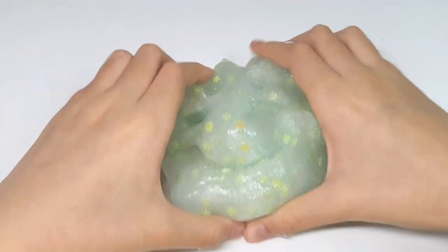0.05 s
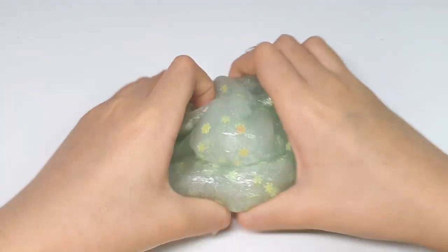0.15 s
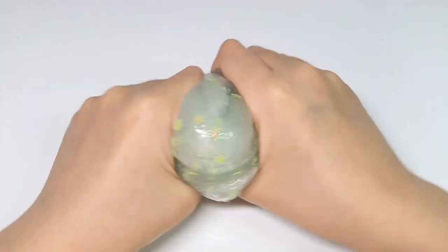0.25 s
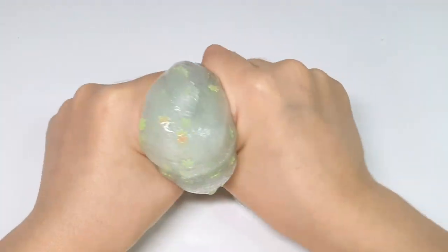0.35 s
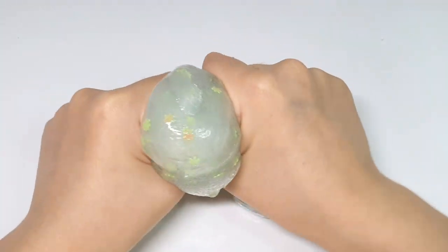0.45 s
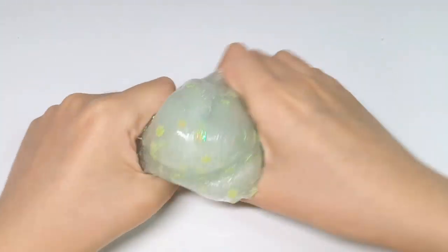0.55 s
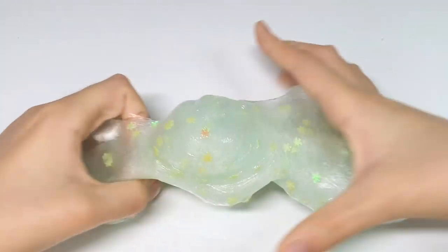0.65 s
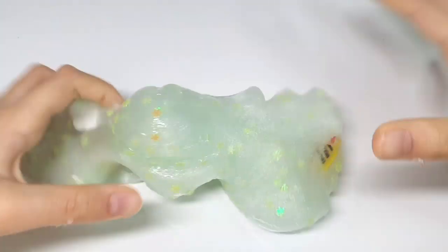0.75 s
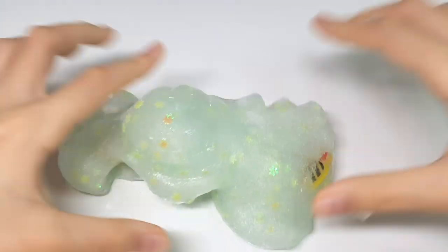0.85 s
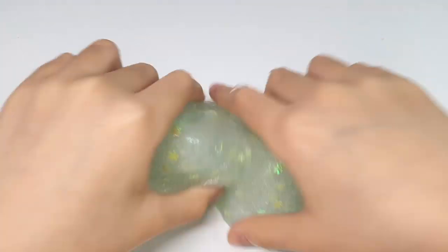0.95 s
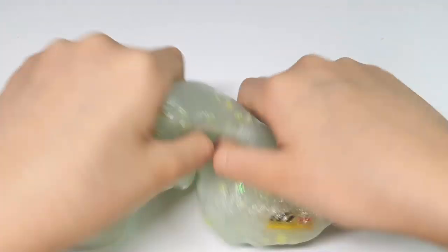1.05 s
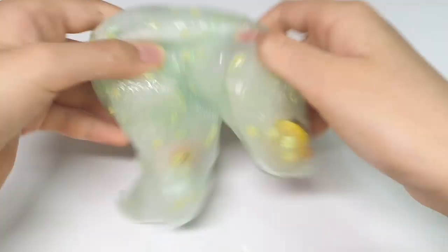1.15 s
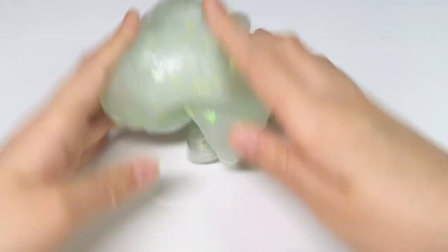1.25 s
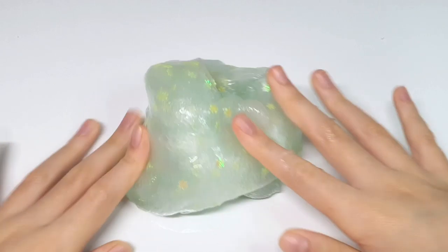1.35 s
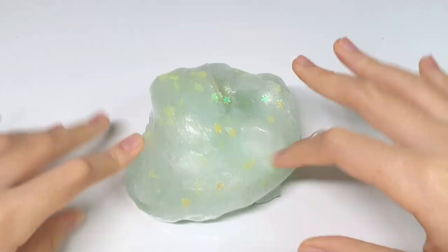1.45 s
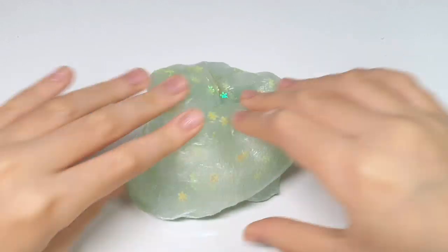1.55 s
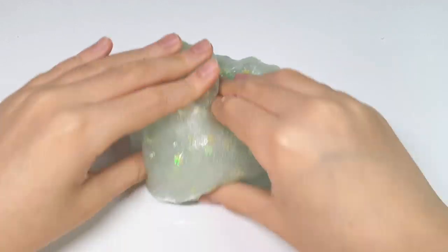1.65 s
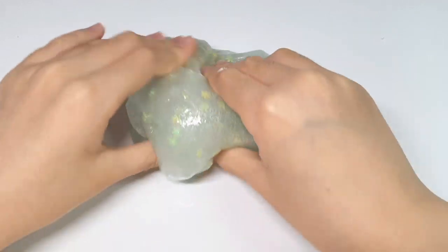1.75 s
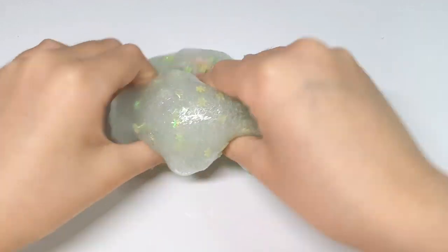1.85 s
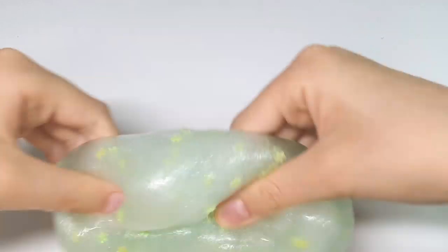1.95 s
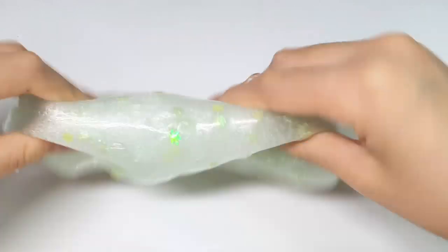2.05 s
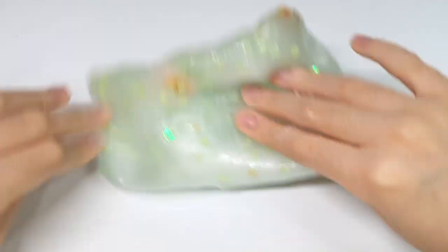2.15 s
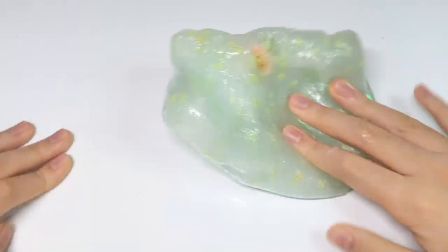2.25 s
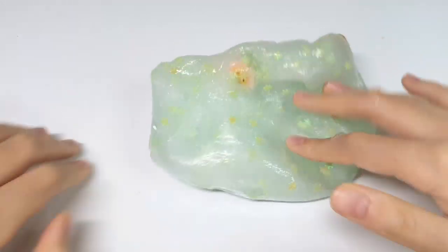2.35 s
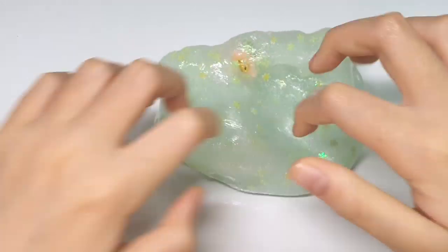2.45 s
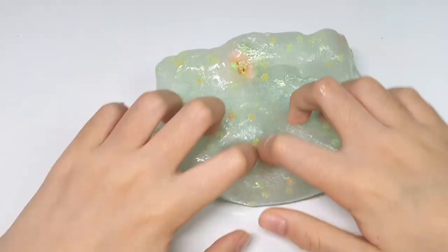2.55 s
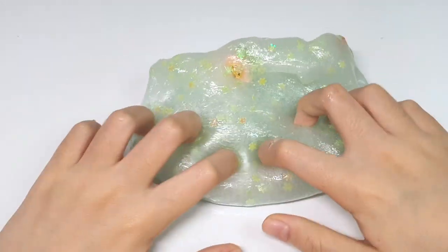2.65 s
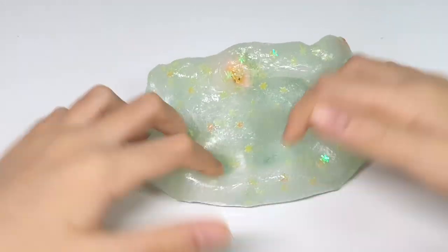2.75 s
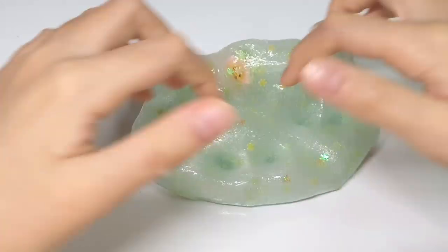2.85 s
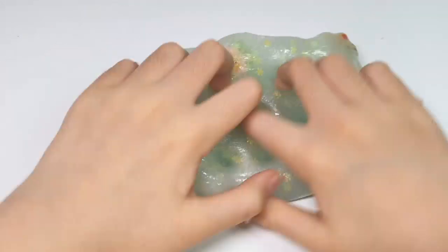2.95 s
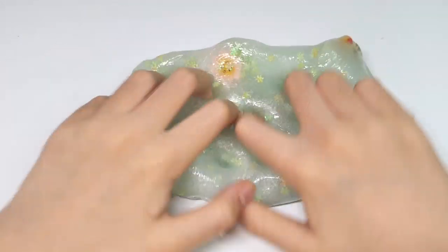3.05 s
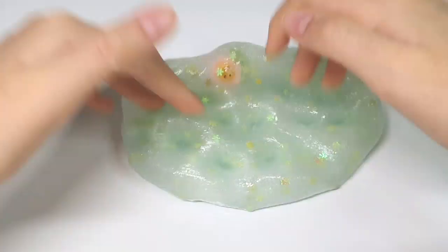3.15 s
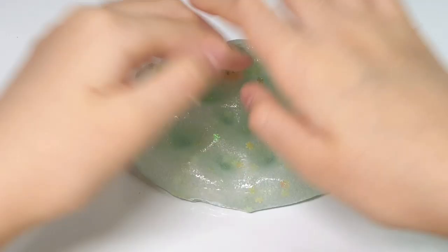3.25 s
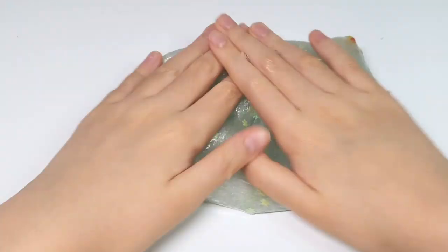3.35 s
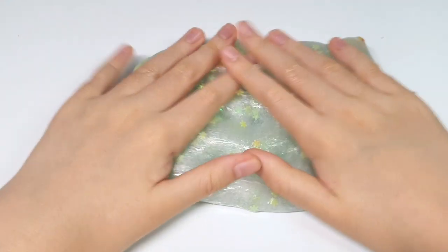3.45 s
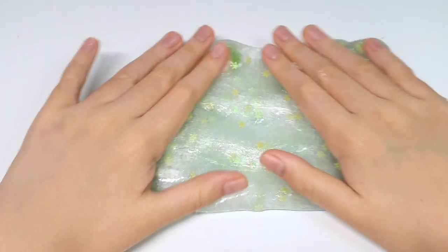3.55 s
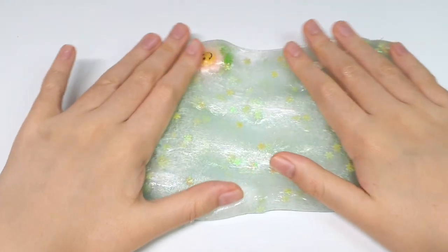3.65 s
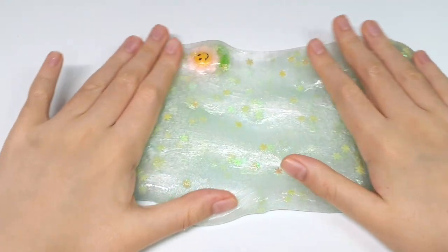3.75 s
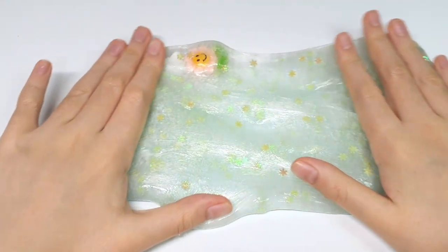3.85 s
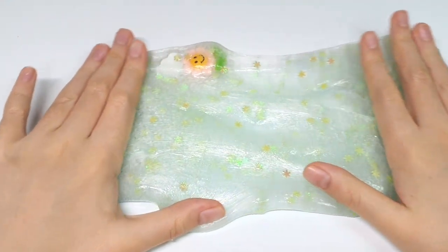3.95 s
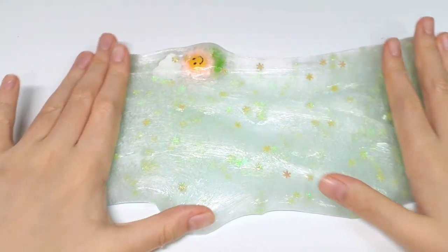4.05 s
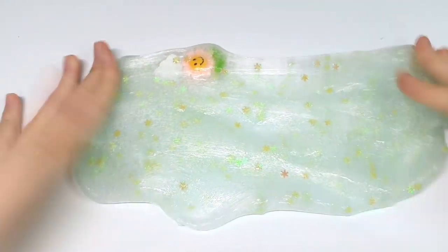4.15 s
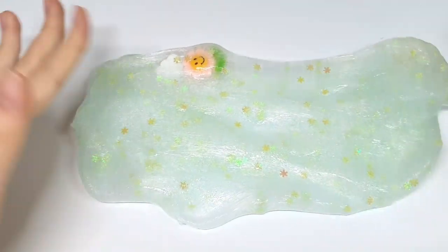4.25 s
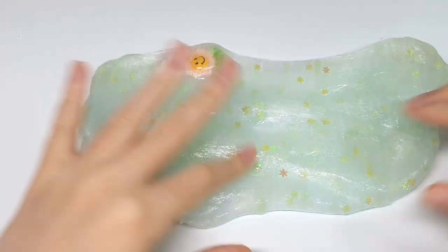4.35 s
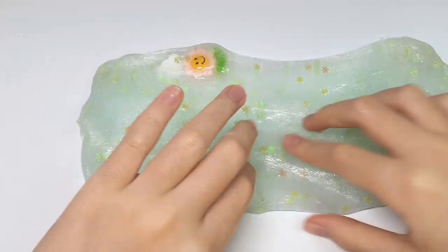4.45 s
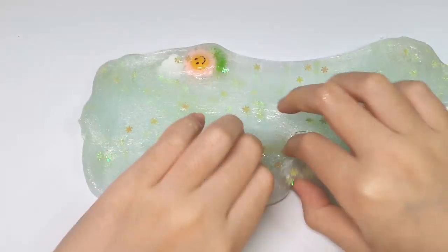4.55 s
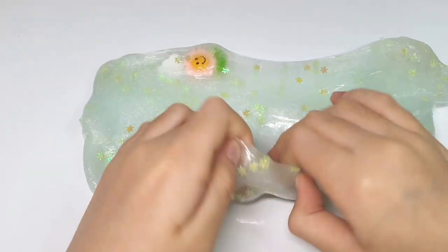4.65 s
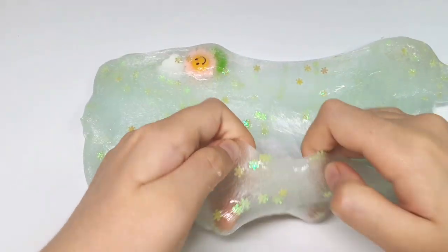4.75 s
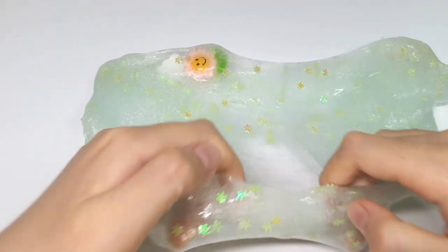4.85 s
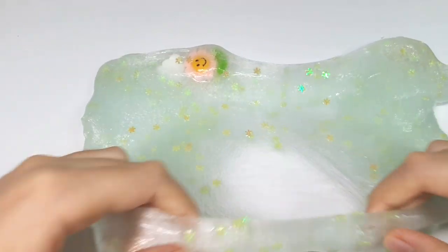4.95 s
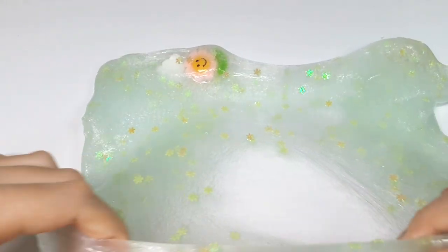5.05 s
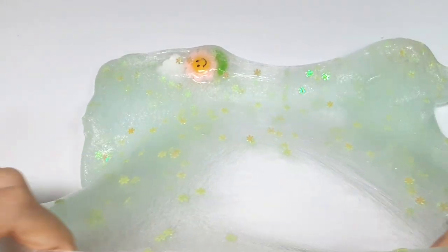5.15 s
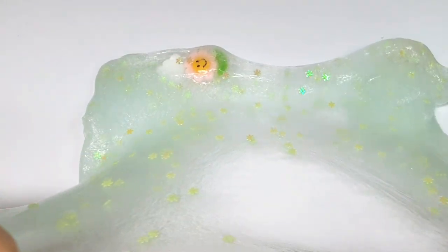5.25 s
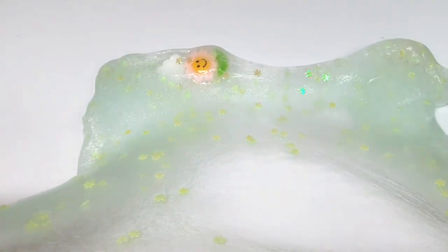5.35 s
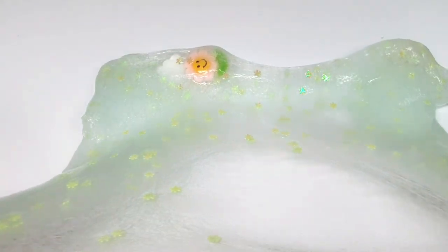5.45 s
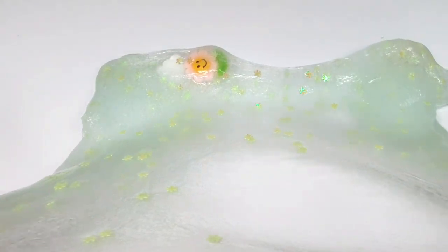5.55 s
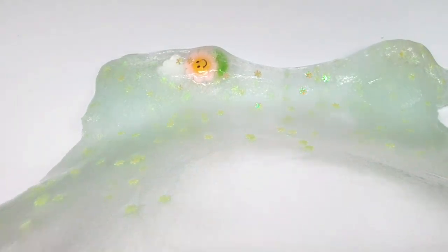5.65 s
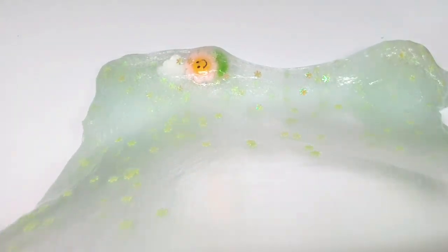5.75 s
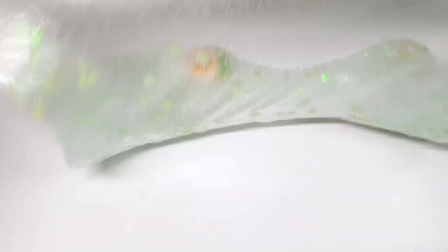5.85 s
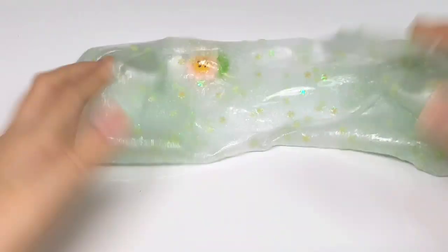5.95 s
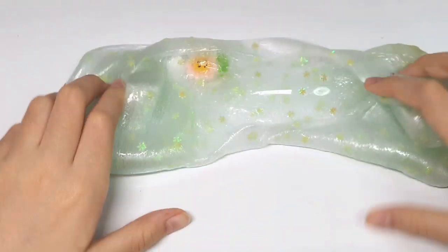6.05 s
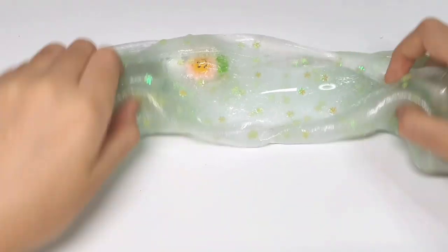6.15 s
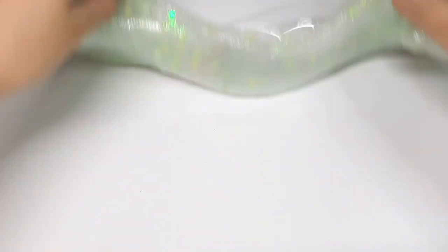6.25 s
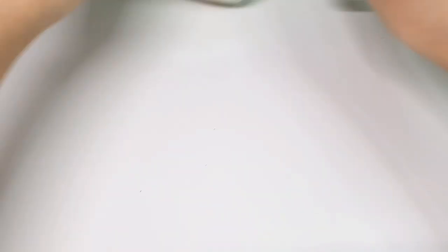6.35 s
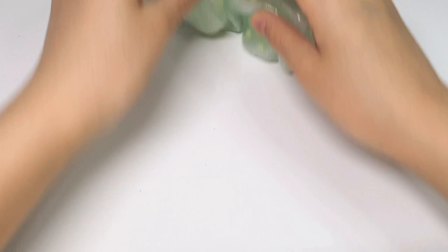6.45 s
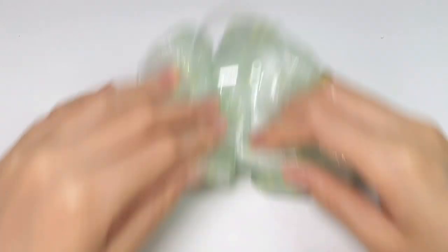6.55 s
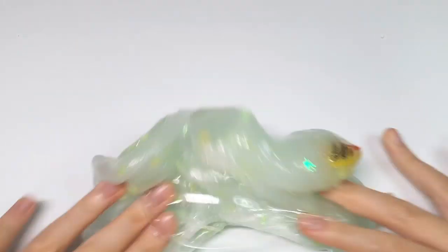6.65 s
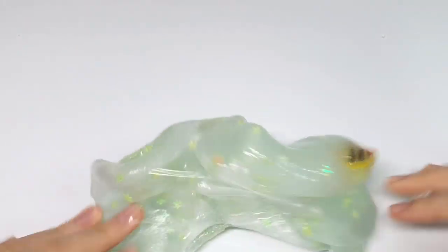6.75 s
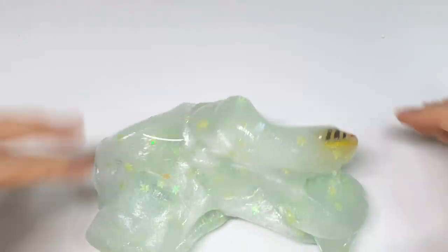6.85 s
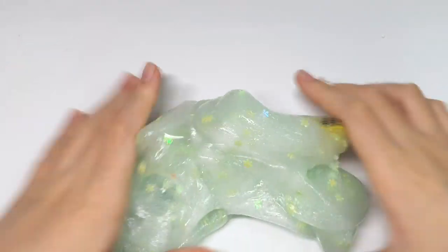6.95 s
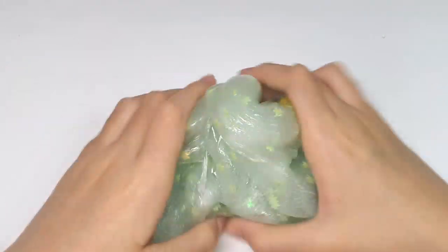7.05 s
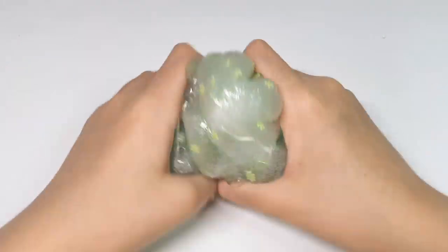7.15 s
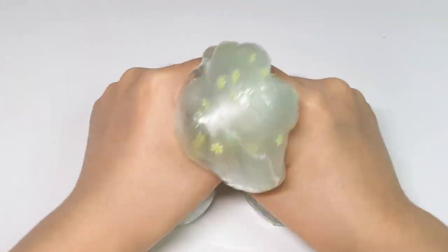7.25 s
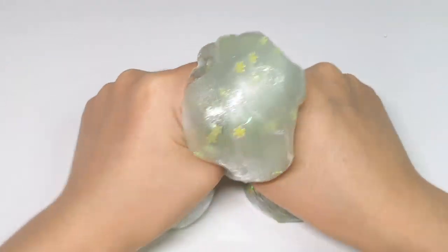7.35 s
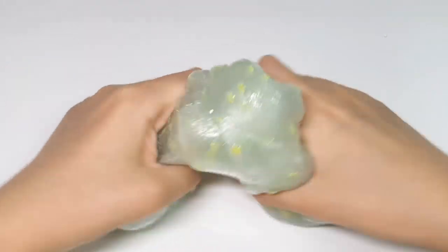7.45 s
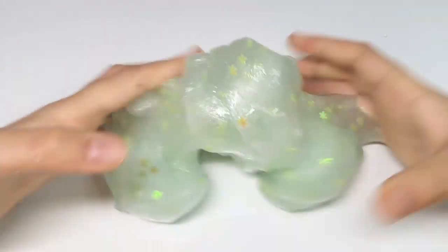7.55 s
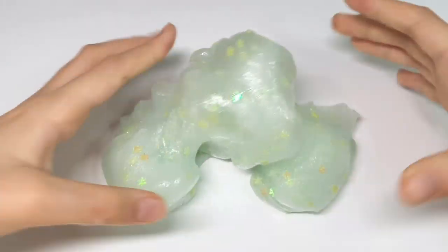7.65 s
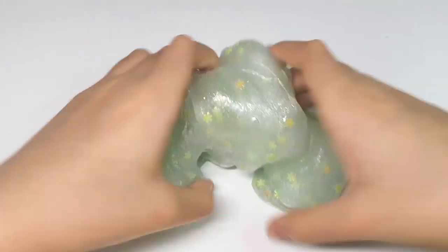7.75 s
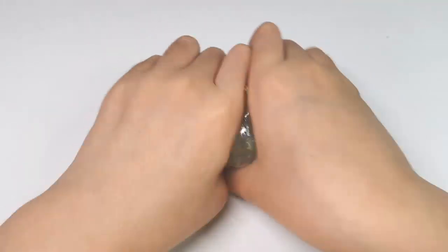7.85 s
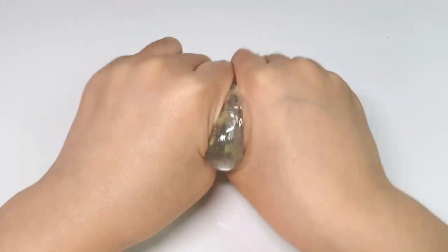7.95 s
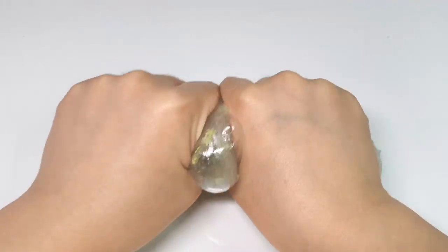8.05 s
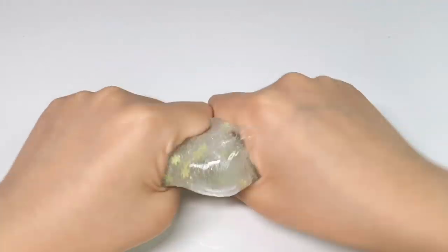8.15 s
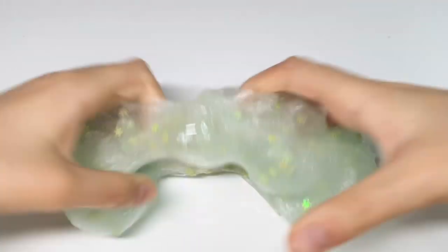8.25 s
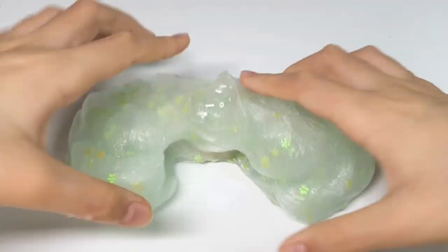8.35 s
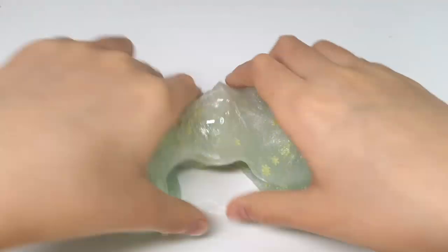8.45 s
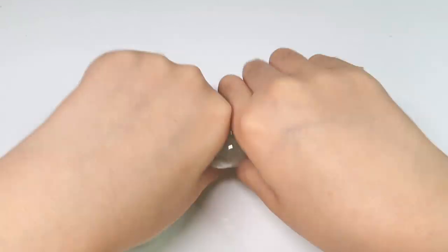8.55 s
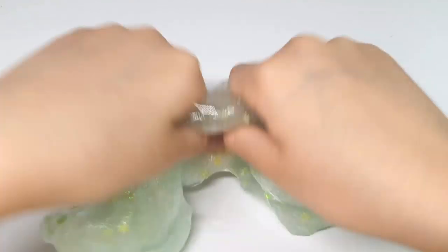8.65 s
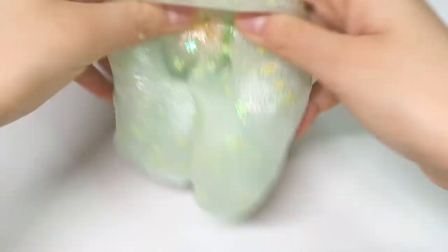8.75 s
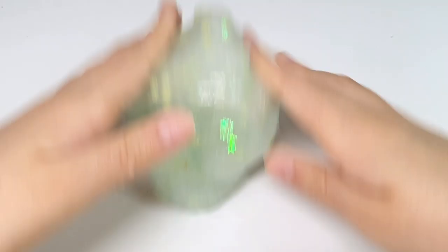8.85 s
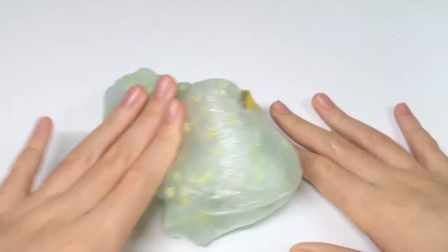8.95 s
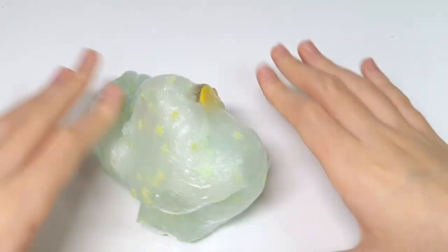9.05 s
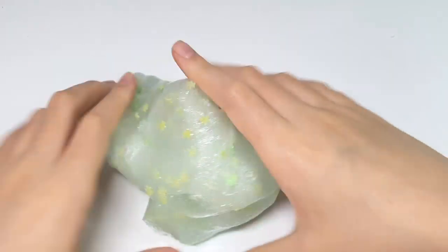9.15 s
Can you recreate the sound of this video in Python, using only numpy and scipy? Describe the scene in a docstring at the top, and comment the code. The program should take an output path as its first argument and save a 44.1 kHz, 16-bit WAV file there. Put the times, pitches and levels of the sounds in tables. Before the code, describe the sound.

Hands knead, fold and stretch sticky slime on a table, with wet crackles, sharp pops, dry snaps and dull thuds, close up in stereo.

```python
"""Two hands knead, fold and stretch sticky slime on a table, heard close up in stereo in a small, quiet room.
Under it all lie a soft room hiss and a faint ticking of sticky film, built from random clicks.
From the start, landings thud as damped bounces, air pockets pop as short rings, and grips crackle and fizz.
Threads snap with dry clicks and taut film squeaks. Near 5 s the drawn-out sheet is almost silent, with a faint
hum. From about 6 s grips and landings return, and the pops soon crowd together until the end."""
import sys
import numpy as np
from scipy import signal
from scipy.fft import rfft, irfft, next_fast_len
from scipy.io import wavfile
from scipy.ndimage import uniform_filter1d

SR = 44100
rng = np.random.default_rng(int(sys.argv[2]) if len(sys.argv) > 2 else 0)


def master_out(mix):
    """Clip the mix to full scale and print it as 16-bit PCM to the path in sys.argv[1]."""
    frames = np.transpose(np.atleast_2d(mix))
    ceiling = np.clip(frames, -1, 1)
    pcm = np.round(ceiling * 32767).astype(np.int16)
    wavfile.write(sys.argv[1], SR, pcm)


N = 406161

# hands and slime land on the table; a tight lump bounces faster than a slack one:
# (time [s], relative thud level [dB], relative palm slap level [dB], bounce pitch [Hz])
LANDINGS = [(0.0366, -25.5, -67, 124.3), (0.6511, -39.5, -59, 120), (0.77, -43, -53.5, 125),
            (0.874, -43, -62, 115), (1.0203, -29, -32, 130.4), (1.4157, -31.5, -39, 118),
            (1.648, -38, -45.5, 139), (1.8243, -39.5, -52, 129), (1.963, -41, -51.5, 101),
            (2.2099, -27.5, -28, 114.5), (2.235, -42, -45, 44.8), (2.827, -42.5, -51, 136),
            (3.3836, -41, -52, 129), (4.038, -60.5, -58.5, 145), (4.427, -36.5, -45, 110),
            (4.4953, -37, -54, 123), (6.053, -33, -42.5, 45.4), (7.021, -27.5, -44.5, 124.7),
            (7.109, -36.5, -49, 134), (8.957, -25.5, -34, 116.6)]
# low resonances of the table top, which thud: (pitch [Hz], width [Hz], level [dB])
THUD_MODES = [(36, 36, -3), (118.1, 13, 4), (141.5, 7, 5.5), (175.3, 1.9, 2)]
# upper resonances of the table top, which slap: (pitch [Hz], width [Hz], level [dB])
SLAP_MODES = [(270, 37, -2.5), (330, 43, -1), (392.2, 18, 2), (457, 13, 0.5), (611, 29, -8.5),
              (726, 19, -9)]
# shared colour of crackle and clicks, strongest near 1.9 kHz: (frequency [Hz], level [dB])
CRACKLE_COLOUR = [(700, -18), (1150, 2), (1550, 1.5), (1850, 7.5), (2400, -3), (2750, -1), (4500, -10.5),
                  (6500, -33.5)]
LET_GO_DB_PER_S = 228   # how fast a lean or a squeak dies away as the hand lets go
SPURTS_PER_S = 64   # fingers stick and slip, so all sizes of rupture come in spurts
LEAD_S = 7e-5   # the sound reaches the left microphone first


def from_db(db):
    """Turn decibels into a plain gain."""
    return 10 ** (np.asarray(db) / 20)


def rms_one(x):
    """Scale a sound to unit average level."""
    return x / np.sqrt(np.mean(x ** 2) + 1e-20)


def cut(x, hz, kind, order=2):
    """Keep the low, high or middle band of a sound."""
    sos = signal.butter(order, np.minimum(hz, .45 * SR), kind, fs=SR, output="sos")
    return signal.sosfilt(sos, x)


def colour(x, spectrum):
    """Shape a sound by a spectrum drawn on a log-frequency axis."""
    hz, db = np.transpose(spectrum)
    size = next_fast_len(x.shape[-1])
    bins = np.maximum(np.fft.rfftfreq(size, 1 / SR), 1)
    gain = from_db(np.interp(np.log(bins), np.log(hz), db))
    return irfft(rfft(x, size) * gain, size)[..., :x.shape[-1]]


def resonate(x, hz, width_hz):
    """One resonance with gain 1 on top; a narrow one rings longer."""
    r = np.exp(-np.pi * width_hz / SR)
    feed = np.array([1, 0, -1]) * (1 - r * r) / 2
    ring = [1, -2 * r * np.cos(2 * np.pi * hz / SR), r * r]
    return signal.lfilter(feed, ring, x + 1e-18)


def body(x, modes):
    """Resonances ringing side by side, as in a table top."""
    return sum(from_db(db) * resonate(x, hz, width) for hz, width, db in modes)


def place(x, pan_db, lead_s=LEAD_S):
    """Mono to stereo: the left side is louder by pan_db and earlier by lead_s."""
    left = x * from_db(pan_db / 2)
    right = np.roll(x, round(lead_s * SR)) * from_db(-pan_db / 2)
    return np.stack([left, right]) / np.sqrt(np.cosh(pan_db * np.log(10) / 20))


def add(out, s, sound):
    """Mix a stereo sound in at s seconds."""
    at = max(round(s * SR), 0)
    out[:, at:at + sound.shape[1]] += sound[:, :max(N - at, 0)]


def burst(x, db, length_s):
    """Give a short sound the energy of db held for length_s."""
    return x * from_db(db) * np.sqrt(length_s * SR / (np.sum(x ** 2) + 1e-20))


def grains(per_s, spread_db, clump_db, clumps_per_s):
    """Random ruptures of uneven size; the size drifts, so they come in little avalanches."""
    out = np.zeros(N)
    at = np.flatnonzero(rng.random(N) < per_s / SR)
    clumps = np.interp(at / SR * clumps_per_s, np.arange(SR), rng.standard_normal(SR))
    size_db = spread_db * np.minimum(rng.exponential(1, len(at)), 4) + clump_db * clumps
    out[at] = from_db(size_db) * rng.choice([-1, 1], len(at))
    return out


def even(x, window_s=0.11):
    """Bring each short stretch to about unit level, with the grain left in."""
    power = uniform_filter1d(np.mean(np.atleast_2d(x) ** 2, axis=0), int(window_s * SR))
    return x / np.sqrt(np.maximum(power, 0) + np.mean(power) / 100)


def gesture(s, rise_s, hold_s, fall_db_per_s, swell_db=22.5, slacken_db_per_s=23.5):
    """Power of one hand movement: it swells by swell_db per rise_s, slackens while held, then lets go."""
    near = np.arange(max(int((s - 1) * SR), 0), min(int((s + 1) * SR), N))
    t, hold_s, rise_s = near / SR - s, abs(hold_s), max(rise_s, .003)
    db = swell_db * np.minimum(t, 0) / rise_s
    db -= slacken_db_per_s * np.clip(t, 0, hold_s)
    db -= fall_db_per_s * np.maximum(t - hold_s, 0)
    power = np.zeros(N)
    power[near] = from_db(np.maximum(db, -200)) ** 2
    return power


def room_tone(level_db=-67.5):
    """Still room: faint rumble, alike on both sides, and a diffuse hiss, both from coloured noise."""
    # (frequency [Hz], relative level [dB per Hz])
    still_air = [(15, -37), (25, -1.5), (120, 0), (212, -15), (7510, -43.5), (9570, -50.5), (14800, -36.5),
                 (16000, -51)]
    mid, side = rng.standard_normal((2, N))
    diffuse = 2.0 * cut(side, 500, "high", order=1) * [[1], [-1]]
    return from_db(level_db) * rms_one(colour(mid + diffuse, still_air))


def grip_strength():
    """Gains of squelch, crackle and fizz: all grips, folds and peels of the hands add up in power."""
    # (full grip time [s], rise [s], hold [s], large-pocket squelch level [dB],
    #  small-pocket crackle level [dB], film fizz level [dB])
    grips = [(0.236, 0.13, 0.1, -54, -46.5, -52.5), (0.593, 0.055, 0.038, -47, -41, -48),
             (0.683, 0.12, 0.12, -61.5, -47, -51.5), (1.026, 0.019, 0.087, -61, -50.5, -60),
             (1.206, 0.46, 0.28, -63, -59, -62), (1.4, 0.31, 0.07, -59.5, -59, -61.5),
             (1.654, 0.041, 0.35, -57, -54.5, -61), (1.958, 0.15, 0.013, -47, -40.5, -47),
             (2.122, 0.04, 0.042, -58, -50, -49), (2.203, 0.009, 0.039, -50.5, -38, -50.5),
             (2.397, 0.098, 0.006, -62.5, -56, -59.5), (2.802, 0.074, 0.01, -47, -50, -50),
             (3.169, 0.062, 0.021, -48, -48.5, -50), (3.263, 0.01, 0.013, -53, -49.5, -74),
             (3.376, 0.11, 0.17, -67, -64, -67.5), (3.897, 0.49, 0.073, -75, -66, -70.5),
             (4.179, 0.21, 0.037, -63.5, -51.5, -53.5), (4.421, 0.022, 0.11, -61.5, -64, -76.5),
             (4.713, 0.29, 0.071, -69.5, -54, -62), (4.842, 0.13, 0.19, -87, -67, -73.5),
             (5.915, 0.017, 0.02, -65.5, -62, -59.5), (5.984, 0.023, 0.0063, -49, -40.5, -47),
             (6.12, 0.04, 0.057, -75, -54, -66), (6.264, 0.23, 0.04, -58.5, -49.5, -53),
             (6.478, 0.17, 0.044, -56, -49.5, -58), (6.642, 0.054, 0.15, -54.5, -52, -49.5),
             (7.017, 0.011, 0.012, -61, -47, -58.5), (7.118, 0.15, 0.11, -65, -49.5, -59.5),
             (7.23, 0.012, 0.12, -54, -50.5, -52.5), (7.504, 0.1, 0.072, -52, -41.5, -45.5),
             (7.925, 0.1, 0.11, -59.5, -53.5, -57), (8.08, 0.012, 0.0052, -55, -44.5, -33.5),
             (8.22, 0.1, 0.093, -52, -45, -45.5), (8.674, 0.066, 0.059, -55.5, -48, -53),
             (8.824, 0.063, 0.033, -57, -45, -50), (8.948, 0.076, 0.042, -47.5, -48.5, -52)]
    # film that keeps ticking faintly between grips: (squelch level [dB], crackle level [dB], fizz level [dB])
    resting_db = (-91.5, -80.5, -81.5)
    # dying away after a grip: (squelch fall [dB/s], crackle fall [dB/s], fizz fall [dB/s])
    falls = (225.5, 259, 281)
    power = np.outer(from_db(resting_db) ** 2, np.ones(N))
    for s, rise_s, hold_s, *levels_db in grips:
        for layer, db, fall in zip(power, levels_db, falls):
            layer += from_db(db) ** 2 * gesture(s, rise_s, hold_s, fall)
    return np.sqrt(power)


def pockets(spectrum, low_hz, high_hz, per_s, spread_db, pan_db, ring_cycles, size,
            rise=0.03, wander=0.25, wander_per_s=30):
    """Air pockets collapse in clusters, each ringing at its own pitch, which rises as it closes."""
    clicks = grains(per_s, spread_db, 2.2, SPURTS_PER_S)
    at, age = np.flatnonzero(clicks)[:, None], np.arange(size)
    own, side = rng.uniform(-1.011, 1, (len(at), 2)).T[:, :, None]
    # the fingers reach now one size of pocket, now another
    reach = np.interp(at / SR * wander_per_s, np.arange(SR), rng.uniform(-0.95, 1, SR))
    hz = np.sqrt(low_hz * high_hz) * (high_hz / low_hz) ** ((own + wander * reach) / 2)
    cycles = hz * age / SR
    wave = np.sin(2 * np.pi * cycles * (1 + rise * cycles / ring_cycles))
    rings = clicks[at] * hz * wave * np.exp(-cycles / ring_cycles)
    lead = np.round((LEAD_S + 1e-4 * side) * SR).astype(int)
    pan = from_db((pan_db + 2 * side) / 2)
    out = np.stack([np.bincount(((start + age) % N).ravel(), (rings * gain).ravel(), N)
                    for start, gain in ((at - lead, pan), (at, 1 / pan))])
    return even(cut(colour(out, spectrum), low_hz / 2, "high"))


def film(spectrum, low_hz, per_s, spread_db, pan_db, count=4):
    """Tiny threads of slime snap off skin and table, all across the lump."""
    out = 0
    for side in np.linspace(-1, 1, count):
        ticks = grains(per_s / count, spread_db, clump_db=4.0, clumps_per_s=110)
        out = out + place(ticks, pan_db + 4 * side, LEAD_S + 12e-5 * side)
    return even(cut(colour(out, spectrum), low_hz, "high"))


def squelching():
    """Large air pockets collapse with low rings, and the table top rings along."""
    # colour of large pockets: (frequency [Hz], level [dB])
    large_colour = [(200, -11), (380, -5), (620, -3), (850, -8), (1400, -2.5)]
    squelch = pockets(large_colour, 311.4, 1123, per_s=700, spread_db=5.0, pan_db=0.5,
                      ring_cycles=2.4, size=768)
    return even(squelch + 2 * body(squelch, SLAP_MODES))


def crackling(bubbles_db=-5, ticks_db=-6):
    """Small pockets ring as bubbles, mixed with dry ticks of the film."""
    bubbles = pockets(CRACKLE_COLOUR, 1102, 4650, per_s=1200, spread_db=6.0, pan_db=2.5,
                      ring_cycles=3.6, size=384)
    ticks = film(CRACKLE_COLOUR, 900, per_s=900, spread_db=4.0, pan_db=2.5)
    return from_db(bubbles_db) * bubbles + from_db(ticks_db) * ticks


def fizzing(lone_snaps_db=-7.5):
    """The tacky film peels in thousands of tiny snaps, with lone, larger ones among them."""
    # (frequency [Hz], relative level [dB per Hz])
    film_colour = [(2800, -1), (4500, -1), (6000, -3), (7600, 0), (9800, -8.5), (12600, 1), (15000, -4),
                   (16500, -20)]
    fine = film(film_colour, 2500, per_s=7000, spread_db=2.0, pan_db=-0.2)
    lone = film(film_colour, 2500, per_s=99, spread_db=5.5, pan_db=5.0)
    return fine + from_db(lone_snaps_db) * lone


def kneading(squelch_gain, crackle_gain, fizz_gain, spurt_db=2.5):
    """Three sizes of rupture follow the grips, in shared spurts as the fingers stick and slip."""
    drift = np.interp(np.arange(N) / SR * SPURTS_PER_S, np.arange(SR), rng.standard_normal(SR))
    spurts = from_db(spurt_db * drift)
    pocket_sound = squelching() * squelch_gain + crackling() * crackle_gain
    return pocket_sound * spurts + fizzing() * fizz_gain * np.sqrt(spurts)


def pressing(grip_gain, side_db=-16, lean_rise_s=0.053, grip_rumble_db=0.5,
             settle_db=-7, settle_rise_s=0.013, settle_db_per_s=128):
    """The table top rumbles under grips and leaning hands, and while the lump settles after a landing."""
    # hands lean their weight on the table: (time [s], hold [s], level [dB])
    leans = [(0.25, 0.14, -51.5), (0.906, 0.037, -53), (1.326, 0.044, -44), (1.904, 0.024, -49),
             (2.606, 0.036, -50.5), (3.004, 0.027, -49), (3.502, 0.077, -53), (4.185, 0.15, -48),
             (6.007, 0.029, -42), (7.015, 0.05, -37), (7.292, 0.02, -44), (7.547, 0.026, -47),
             (7.787, 0.093, -52), (8.927, 0.073, -40)]
    leaning = sum(from_db(db) ** 2 * gesture(s, lean_rise_s, hold_s, LET_GO_DB_PER_S)
                  for s, hold_s, db in leans)
    settling = sum(from_db(db + settle_db) ** 2
                   * gesture(s + settle_rise_s, settle_rise_s, 0, settle_db_per_s)
                   for s, db, *_ in LANDINGS)
    rumble_gain = np.sqrt(leaning + settling + (from_db(grip_rumble_db) * grip_gain) ** 2)
    force = place(rng.standard_normal(N), 0.98) + from_db(side_db) * rng.standard_normal((2, N))
    low = cut(body(force, THUD_MODES), 166.4, "low", order=4)
    upper = cut(body(force, SLAP_MODES), 500, "low")
    return even(low + from_db(-18) * upper, window_s=0.054) * rumble_gain


def thumps(thud_decay_s=0.026, tighten=0.2, tighten_s=0.012, slap_hz=420, slap_decay_s=0.0078,
           settle_s=0.047, thump_s=0.014, squish=0.019):
    """The lump lands with a damped bounce whose pitch slides down as it spreads, and smacks on unevenly."""
    out, t = np.zeros((2, N)), np.arange(SR // 2) / SR
    for s, thud_db, slap_db, hz in LANDINGS:
        # uneven little smacks keep the table top ringing
        smacks = rng.standard_normal(len(t)) * rng.exponential(1, len(t)) ** 2
        force = (t == 0) + squish * rms_one(smacks) * np.exp(-t / settle_s)
        turns = np.cumsum(hz * (1 + tighten * np.exp(-t / tighten_s))) / SR
        bounce = np.sin(2 * np.pi * turns) * np.exp(-t / thud_decay_s)
        palm_hz = slap_hz * from_db(rng.uniform(-1.3, 1))
        palm = np.sin(2 * np.pi * palm_hz * t) * np.exp(-t / slap_decay_s)
        # each spot favours other modes
        struck = [(mode_hz, width, db + 2 * rng.standard_normal()) for mode_hz, width, db in SLAP_MODES]
        low_ring = cut(body(force, THUD_MODES), 130, "low")
        upper_ring = cut(body(force, struck), 658, "low", order=4)
        thud = burst(bounce, 0, thump_s) + burst(low_ring, -4.0, thump_s)
        slap = burst(palm, -1.5, thump_s) + burst(upper_ring, 0, thump_s)
        thump = burst(thud, thud_db + 1.5, thump_s) + burst(slap, slap_db + 4.0, thump_s)
        add(out, s, place(thump, 0.5))
    return out


def pops(large_hz=590, large_decay_s=0.0032, small_decay_s=0.00038, tear_s=0.0019, lead_in_s=0.0022,
         pop_s=0.0033):
    """The film cracks and tears on for a moment; the opened pocket rings for a few cycles."""
    # (time [s], large cavity level [dB], small cavity level [dB], relative spit of the tearing film [dB],
    #  small cavity pitch [Hz], left over right [dB])
    air_pockets = [(0.038, -65, -32.5, -57, 2640, 7), (0.168, -51, -37, -61, 1840, 3),
                   (0.1833, -57, -40, -45.5, 3920, -1), (0.309, -42.5, -42, -50, 1720, 4),
                   (0.3392, -65, -44.5, -41, 2470, 9), (0.6014, -30, -35, -62, 1850, 0),
                   (1.0201, -29, -33, -54, 2020, 0), (1.1542, -49.5, -36, -42, 2060, 7),
                   (1.3499, -41, -36, -42.5, 1870, 11), (1.4153, -34, -38.5, -48.5, 1560, 12),
                   (1.649, -37, -41.5, -43.5, 2280, 1), (1.8246, -36.5, -40.5, -46.5, 1840, 3),
                   (1.962, -48.5, -34, -48, 2060, 4.5), (2.21, -54, -23.5, -41, 1620, 10),
                   (2.5999, -56.5, -44, -75, 1070, 1), (2.7464, -67, -35.5, -42.5, 1790, 1),
                   (2.789, -54, -39.5, -67, 1700, 3), (2.9941, -47, -39.5, -72, 1390, 3),
                   (3.146, -43.5, -40, -45, 1500, 3), (3.2503, -41, -28, -54, 1800, 3.5),
                   (3.3841, -60, -36, -43.5, 1810, -4), (4.427, -49, -28.5, -51, 1960, 2),
                   (4.4939, -37.5, -33.5, -45.5, 2290, 2), (5.986, -48, -30, -38, 2280, 2),
                   (6.0522, -46, -38, -55, 1760, 0), (6.46, -47, -41, -67, 1230, 2),
                   (6.668, -50, -34, -70, 1940, 7), (6.705, -49.5, -36.5, -26.5, 2330, 18),
                   (7.2243, -43, -17, -32.5, 2060, 4), (7.26, -24, -22, -59, 1670, 3),
                   (7.283, -44, -32.5, -31, 2580, 0), (7.3099, -38, -21, -32, 4160, 1),
                   (7.5036, -41, -25.5, -41.5, 2040, 4.5), (7.872, -47, -37, -40.5, 1770, 6),
                   (7.9003, -36, -38.5, -33.5, 2040, 4), (7.9068, -48, -49, -30.5, 2860, 16.5),
                   (7.9498, -32, -28, -32, 3170, 2.5), (8.0028, -48.5, -38.5, -54, 1210, 7),
                   (8.079, -30.5, -30.5, -24.5, 1400, 6), (8.0852, -48, -30.5, -50, 3730, -14),
                   (8.2442, -39, -33.5, -57, 1380, 3), (8.9254, -21.5, -26.5, -28, 1270, 4),
                   (8.9556, -32, -34, -46, 1800, 3.5)]
    out, t = np.zeros((2, N)), np.arange(-256, 1024) / SR
    after = np.maximum(t, 0)
    for s, large_db, small_db, spit_db, hz, pan_db in air_pockets:
        size, delay, side = rng.uniform(-1, 1, 3)
        tear = rng.standard_normal((2, len(t))) * rng.exponential(1, (2, len(t)))
        # a short, softer noise swells before the click
        tear *= np.where(t < 0, 0.3 * np.exp(t / lead_in_s), np.exp(-t / tear_s))
        crack = (t == 0) + 0.07 * tear[0]
        # bounce off the table and the palm
        crack += 0.55 * (np.abs(t - .0012 * (1 + delay / 2)) <= .5 / SR)
        large = np.sin(2 * np.pi * large_hz * (1 + 0.17 * size) * after) * np.exp(-after / large_decay_s)
        small = burst(resonate(crack, hz, 1 / (np.pi * small_decay_s)), 0, pop_s)
        small += burst(colour(crack, CRACKLE_COLOUR), -8.5, pop_s)
        cavity = burst(cut(large, 210, "high"), large_db, pop_s)
        cavity += burst(cut(small, [1100, hz * 2.0], "band"), small_db, pop_s)
        spit = cut(5.0 * (t == 0) + tear, 3400, "high")
        # the spit is lifted on the right and follows the pan only in part
        spit = np.stack([burst(spit[0], spit_db + pan_db / 4, pop_s),
                         burst(spit[1], spit_db + 6.0 - pan_db / 4, pop_s)])
        add(out, s + t[0], place(cavity, pan_db, LEAD_S + 3e-5 * side) + spit)
    return out


def snaps(fray_s=0.003, fray=0.18, snap_s=0.0047):
    """A sticky thread parts in one click and frays for a moment; the click has the same colour as the crackle."""
    # (time [s], dry tick [dB], bright spit [dB])
    threads = [(0.156, -42.5, -65), (0.6515, -40.5, -56), (0.7061, -40.5, -45), (0.768, -40.5, -69),
               (0.8748, -45.5, -56.5), (1.257, -48, -47.5), (1.3178, -49.5, -50), (1.6292, -55, -49),
               (1.849, -53, -52), (2.043, -50.5, -57.5), (2.237, -37.5, -66), (3.036, -56, -51.5),
               (3.43, -48.5, -44.5), (4.644, -45.5, -59), (4.709, -43.5, -70), (4.777, -49.5, -46.5),
               (5.9658, -41, -60), (6.002, -40, -53), (6.246, -48, -41.5), (6.65, -46.5, -53),
               (6.799, -57, -42), (7.017, -34.5, -51.5), (7.184, -51.5, -52.5), (7.3371, -33, -38.5),
               (7.881, -53, -43.5), (8.1884, -42, -33), (8.48, -57.5, -60.5), (8.587, -72, -51),
               (8.8233, -42, -44), (9.1855, -42, -53)]
    out, t = np.zeros((2, N)), np.arange(-256, 768) / SR
    for s, tick_db, spit_db in threads:
        fraying = rng.standard_normal((2, len(t))) * (t > 0) * np.exp(-np.abs(t) / fray_s)
        click = (t == 0) + fray * fraying
        tick = burst(colour(click[0], CRACKLE_COLOUR), tick_db, snap_s)
        spit = np.stack([burst(side, spit_db, snap_s) for side in cut(click, 2400, "high")])
        add(out, s + t[0], place(tick, 4 + 2 * rng.standard_normal()) + spit)
    return out


def squeaks(width_share=0.11, sag_per_s=0.3, slips_per_s=2500, rise_s=0.039):
    """Quick slips ring the taut film as it is drawn off the table; its pitch sags as it gives."""
    # squeaks, and one faint low hum of the wide sheet: (time [s], hold [s], level [dB], pitch [Hz])
    taut_film = [(0.24, 0.021, -49.5, 3170), (4.103, 0.033, -60.5, 2950), (4.685, 0.19, -65.5, 4400),
                 (5.42, 0.23, -74, 328), (8.274, 0.004, -47, 4470)]
    out, t = 0, np.arange(N) / SR
    slips = grains(slips_per_s, 5.7, 2.6, SPURTS_PER_S)
    for s, hold_s, db, hz in taut_film:
        near = slice(max(int((s - .5) * SR), 0), int((s + .5) * SR))
        sagging_hz = hz * (1 - sag_per_s * (t[near] - s))
        # a spinning phase turns a plain decay into a ring of moving pitch
        turn = np.exp(2j * np.pi * np.cumsum(sagging_hz) / SR)
        keep = np.exp(-np.pi * width_share * hz / SR)
        rung = np.real(turn * signal.lfilter([1], [1, -keep], slips[near] / turn))
        ring = np.zeros(N)
        ring[near] = rms_one(cut(rung, [hz / 2, hz * 2], "band"))
        out = out + from_db(db) * ring * np.sqrt(gesture(s, rise_s, hold_s, LET_GO_DB_PER_S))
    return place(out, 0.87)


def room(x, t60_s=0.23, gap_s=0.00086, early_db=5, early_s=0.0081, dull_hz=11000):
    """Dense reflections, strongest just after the sound, different on each side."""
    t = np.arange(SR) / SR
    fade = from_db(-60 * t / t60_s) + from_db(early_db) * np.exp(-t / early_s)
    tail = rng.standard_normal((2, len(t))) * (t > gap_s) * fade
    tail = tail / np.sqrt(np.sum(tail ** 2) / 2)
    tail = cut(cut(tail, dull_hz, "low", order=1), 420, "high")
    return signal.fftconvolve(x, tail, axes=1)[:, :N]


def scene():
    """Pops, snaps, crackle and knocks in a small room, over the rumble of the table."""
    squelch_gain, crackle_gain, fizz_gain = grip_strength()
    bed = kneading(squelch_gain, crackle_gain, fizz_gain) + squeaks()
    knocks = thumps()
    bursts = pops() + snaps()
    wet = room(from_db(-8) * bursts + from_db(-5.0) * bed + from_db(-4) * knocks)
    return bursts + bed + knocks + pressing(squelch_gain) + wet + room_tone()


def record(dry, cutoff_hz=16300):
    """The deepest rumble and the top are cut."""
    top_cut = signal.ellip(10, .2, 80, cutoff_hz, fs=SR, output="sos")
    return signal.sosfilt(top_cut, cut(dry, 20, "high"))


dry = scene()
out = record(dry)
master_out(out)
```